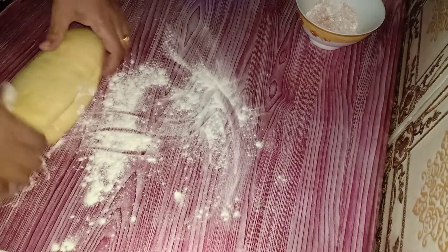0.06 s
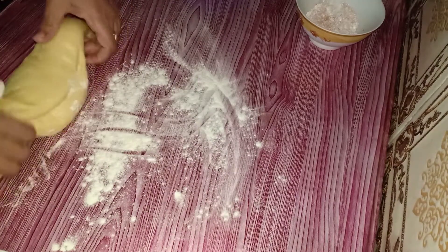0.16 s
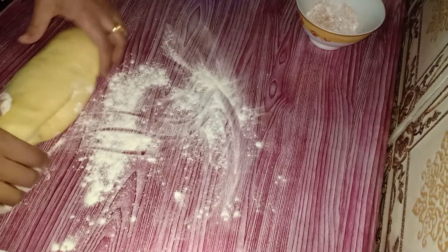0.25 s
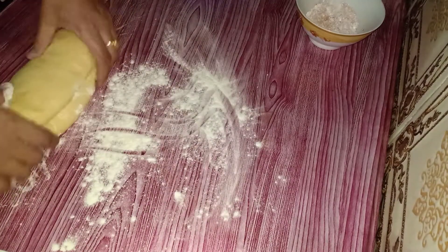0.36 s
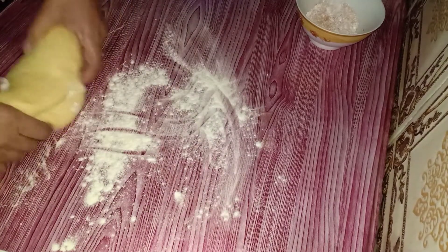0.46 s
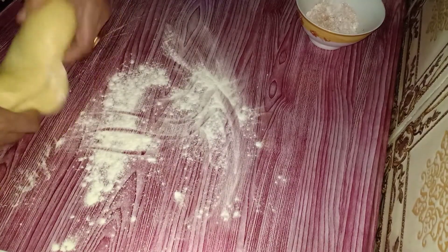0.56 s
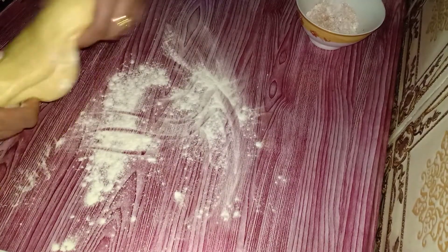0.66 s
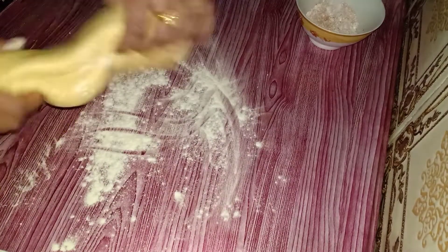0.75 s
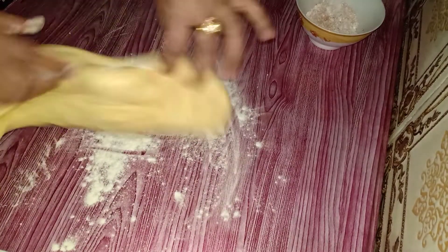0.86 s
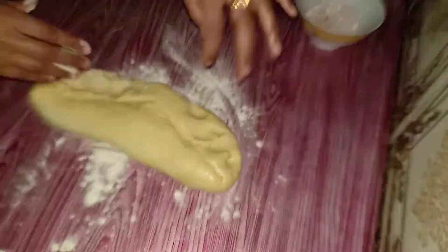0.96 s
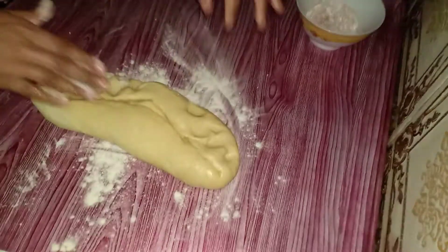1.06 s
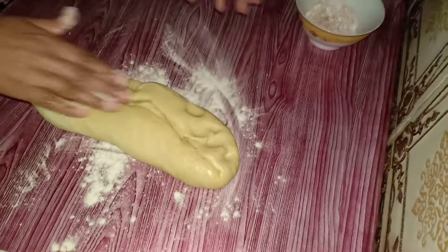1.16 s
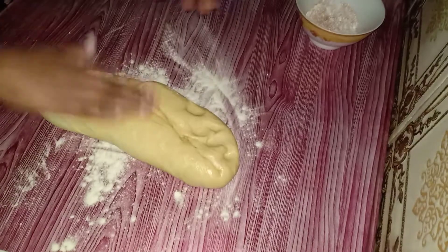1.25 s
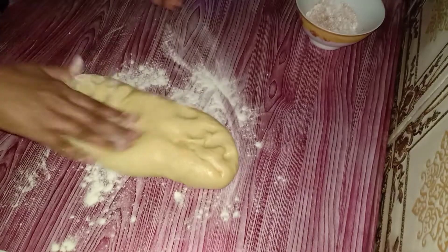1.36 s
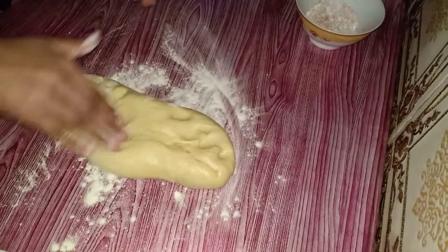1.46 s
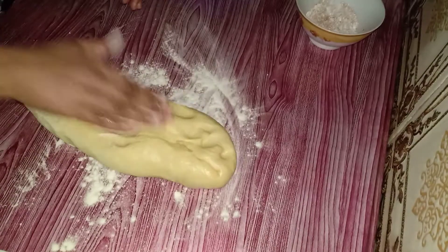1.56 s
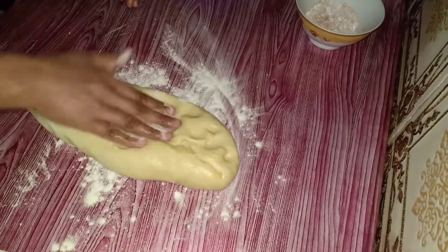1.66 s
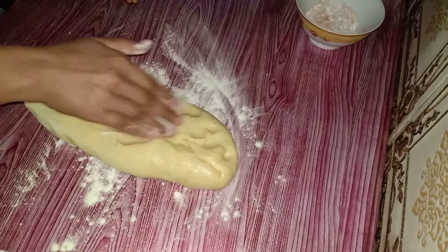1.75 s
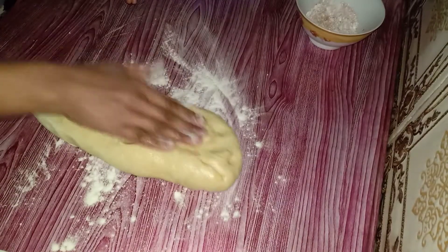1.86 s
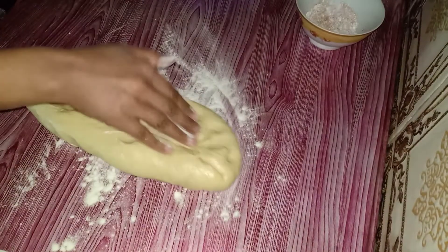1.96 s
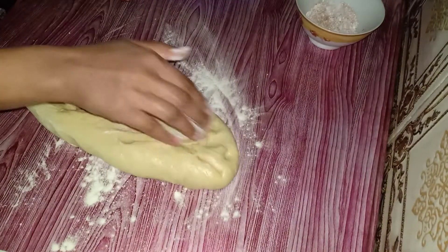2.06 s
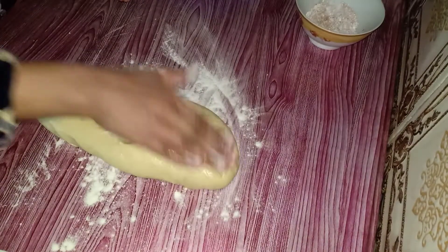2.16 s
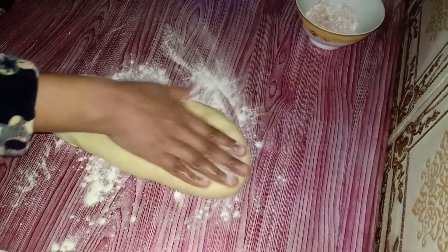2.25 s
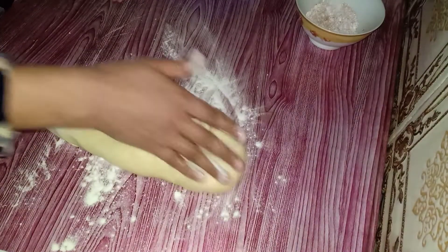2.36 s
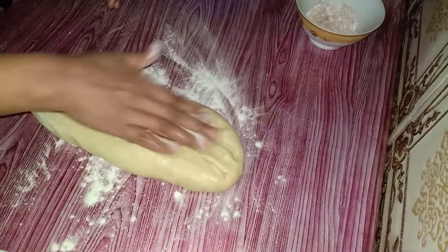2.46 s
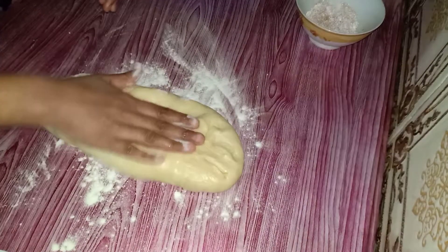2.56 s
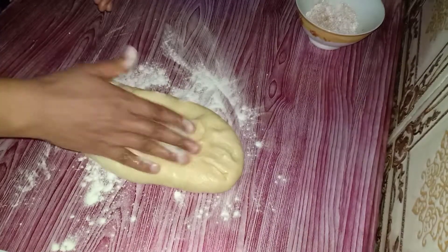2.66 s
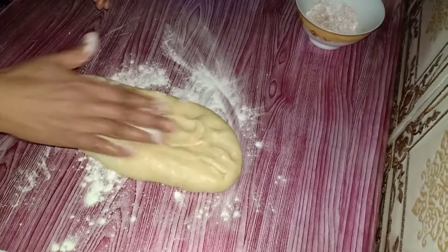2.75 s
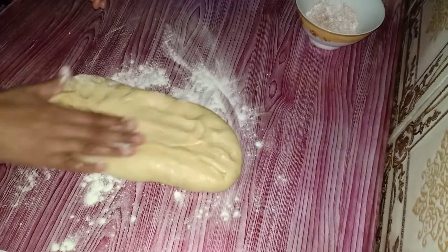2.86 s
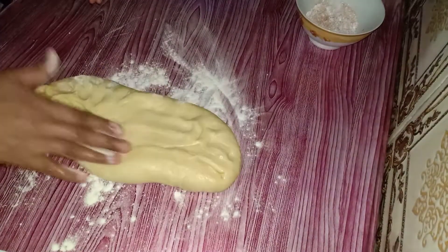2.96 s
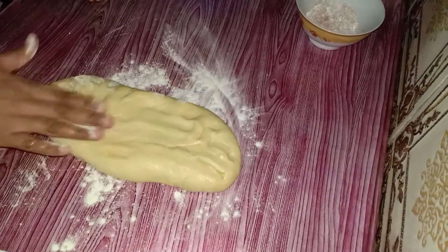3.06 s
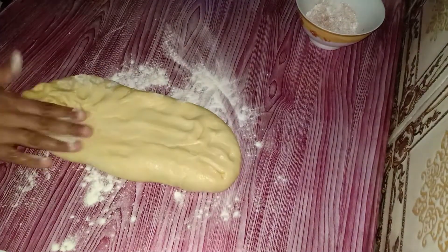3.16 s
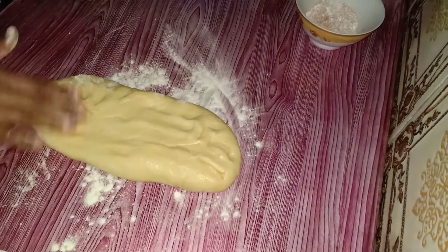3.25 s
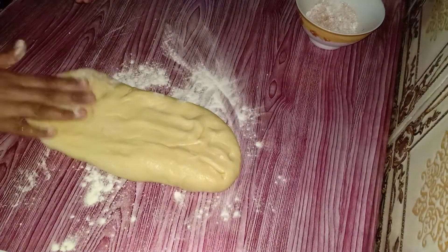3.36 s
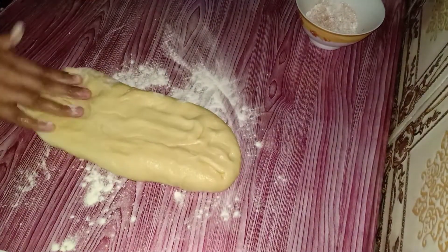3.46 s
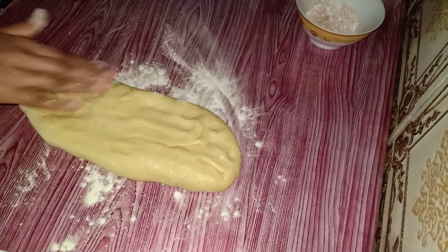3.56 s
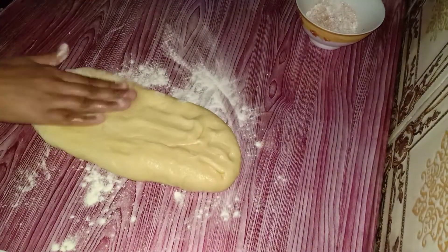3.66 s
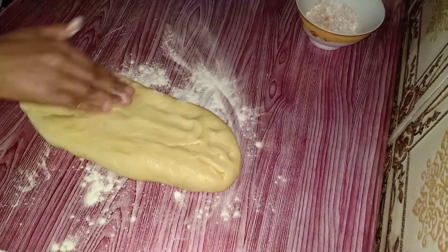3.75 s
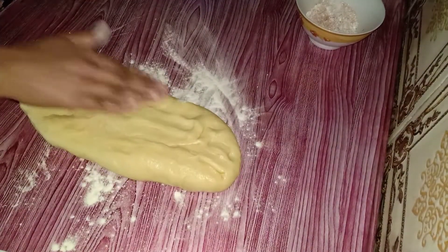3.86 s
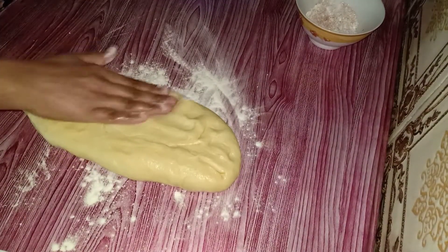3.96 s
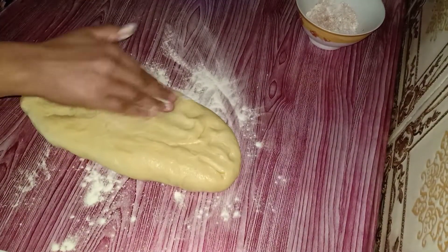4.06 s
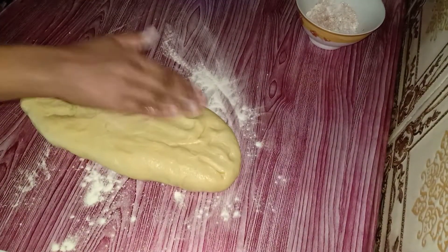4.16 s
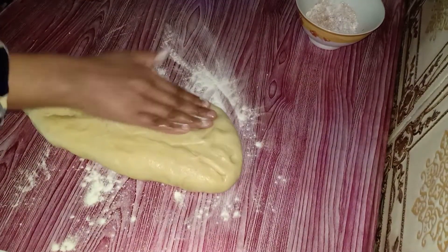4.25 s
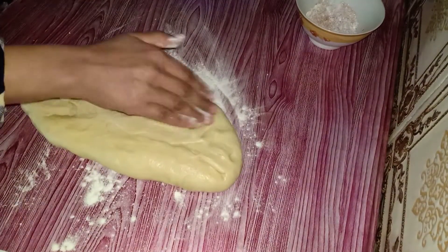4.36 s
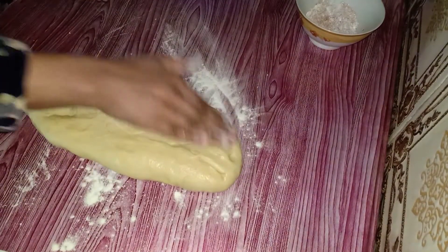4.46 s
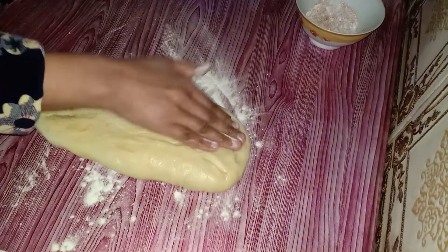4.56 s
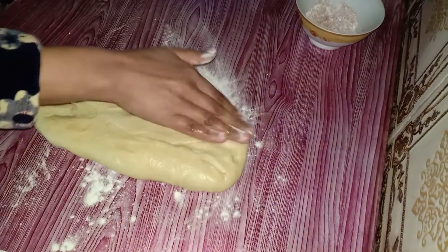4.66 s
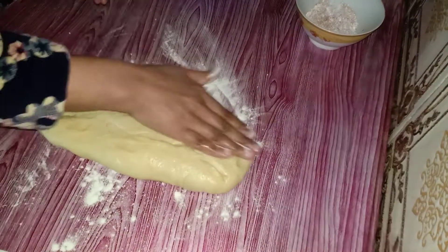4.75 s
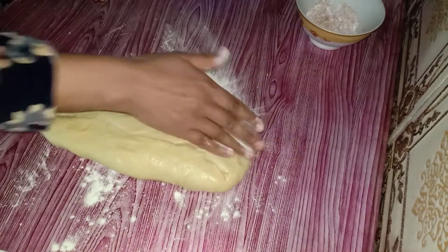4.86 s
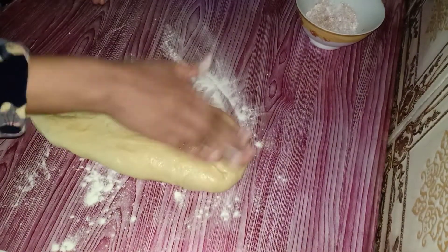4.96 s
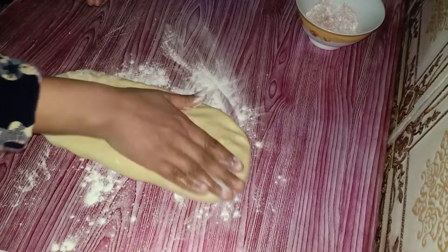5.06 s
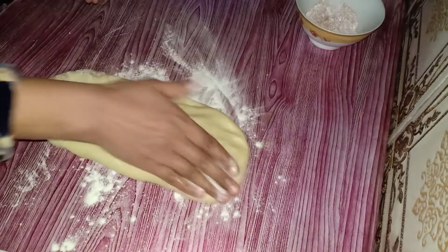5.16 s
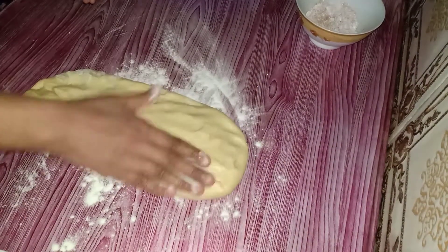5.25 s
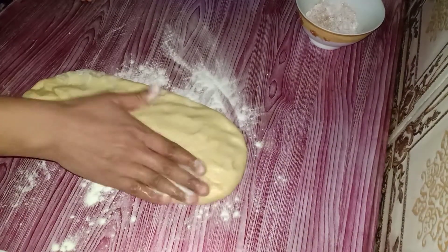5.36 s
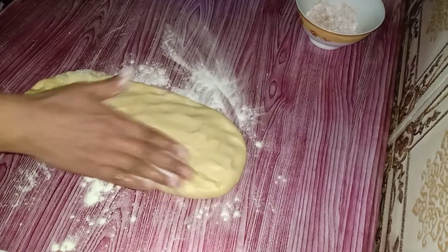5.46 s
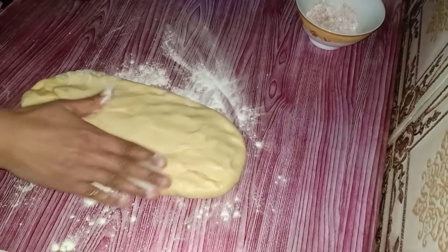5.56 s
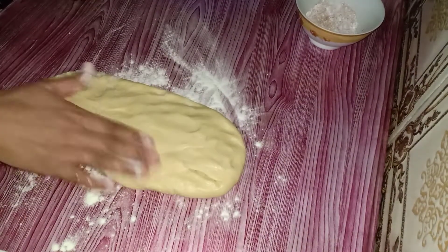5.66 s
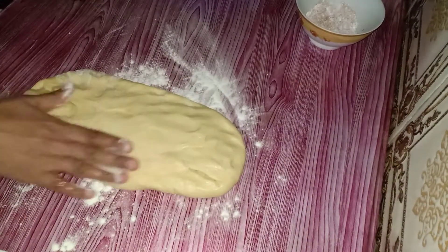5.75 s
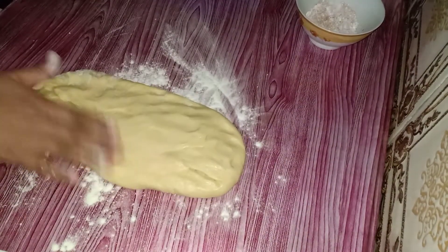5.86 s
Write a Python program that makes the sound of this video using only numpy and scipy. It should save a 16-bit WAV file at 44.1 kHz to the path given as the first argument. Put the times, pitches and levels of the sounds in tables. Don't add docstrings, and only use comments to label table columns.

```python
import sys
import numpy as np
from scipy import signal
from scipy.fft import rfft, irfft, next_fast_len
from scipy.io import wavfile
from scipy.ndimage import uniform_filter1d

SR = 44100
rng = np.random.default_rng(int(sys.argv[2]) if len(sys.argv) > 2 else 0)


def log_audio(samples):
    frames = np.atleast_2d(samples).T
    limited = np.clip(frames, -1, 1)
    pcm = np.round(limited * 32767).astype(np.int16)
    wavfile.write(sys.argv[1], SR, pcm)


def nominal_scale(level):
    x = np.asarray(level, float) / 20
    return 10 ** x


N = 261072
PORT_SIGN = np.array([[1], [-1]])


def rms_one(x):
    return x / np.sqrt(np.mean(x ** 2) + 1e-20)


def at_hz(points, hz):
    table_hz, values = np.array(points)[:, 0], np.array(points)[:, 1]
    return np.interp(np.log(hz), np.log(table_hz), values)


def drift(rate_hz, size):
    r = np.exp(-80 * np.pi * rate_hz / SR)
    white = rng.standard_normal(size // 40 + 2002)
    slow = signal.lfilter([1], [1, -2 * r, r * r], white)[2000:]
    return np.interp(np.arange(size) / 40, np.arange(len(slow)), rms_one(slow))


def ring(x, hz, t60):
    r, w = nominal_scale(-60 / (t60 * SR)), 2 * np.pi * hz / SR
    return signal.lfilter([0, np.sin(w)], [1, -2 * r * np.cos(w), r * r], x + 1e-18)


def coloured(x, spectrum):
    size = next_fast_len(x.shape[-1] + 4096)
    hz = np.maximum(np.arange(size // 2 + 1) * SR / size, 10)
    cepstrum = irfft(at_hz(spectrum, hz) * np.log(10) / 20, size)
    cepstrum[1:size // 2] *= 2
    cepstrum[size // 2 + 1:] = 0
    return irfft(rfft(x, size) * np.exp(rfft(cepstrum)), size)[..., :x.shape[-1]]


# frequency in Hz, likeness from 0 to 1.
PORT_LIKENESS = [(60, 0.99), (180, 0.95), (550, 0.4), (1650, 0.021), (4970, 0.022), (15000, 0.015)]


def diffuse(size, band_gain):
    edges_hz = 30 * 2 ** np.arange(0, 9.1, .5) * 1.03
    white = rng.standard_normal((2, 2, size))
    out = 0
    for k, (low, high) in enumerate(zip(edges_hz, edges_hz[1:])):
        band = signal.butter(2, [low, high], "band", fs=SR, output="sos")
        mid, side = signal.sosfilt(band, white[k % 2])
        hz = np.sqrt(low * high)
        alike = np.clip(at_hz(PORT_LIKENESS, hz), 0, 1)
        out = out + band_gain(hz) * (np.sqrt(1 + alike) * mid + np.sqrt(1 - alike) * side * PORT_SIGN)
    return out


def stroke(spectrum, level_db, grain_db, flicker_db, flicker_hz):
    grains = rng.standard_normal((2, N)) * nominal_scale(grain_db * rng.standard_normal(N))
    return rms_one(coloured(grains, spectrum)) * nominal_scale(level_db + flicker_db * drift(flicker_hz, N))


def strokes(rows, rest_db):
    t = np.arange(0, N + 32, 32) / SR
    level_db = np.full(len(t), float(rest_db))
    for s, length, first_db, last_db, rise, fall in rows:
        held = np.interp(t, [s, s + length], [first_db, last_db])
        before, after = np.maximum(s - t, 0), np.maximum(t - s - length, 0)
        level_db = np.maximum(level_db, held - rise * before - fall * after)
    return np.interp(np.arange(N) / SR, t, level_db)


def strike(rows, families):
    rows, out = np.array(rows), np.zeros((2, N))
    at = (rows[:, 0] * SR).astype(int)
    family_gain_db = rows[:, 1:2] + np.c_[np.zeros(len(rows)), rows[:, 2:]]
    luck = rng.standard_normal((len(rows), 2, 20))
    count = 0
    for column, (modes, contact_hz, family_db, opposed) in enumerate(families):
        family = 0
        for hz, level_db, t60 in modes:
            strength = nominal_scale(family_gain_db[:, column] + family_db + level_db + 1.5 * luck[:, 0, count])
            lean = np.clip(hz / 2700.0, 0, 1) * luck[:, 1, count]
            clicks = np.zeros((2, N))
            clicks[:, at] = strength * (1 + lean * PORT_SIGN)
            family = family + ring(clicks, hz, t60) * (-1) ** (count * opposed)
            count += 1
        out += signal.sosfilt(signal.butter(2, contact_hz, fs=SR, output="sos"), family)
    return out


# frequency in Hz, level in dB per Hz.
FLOOR_COLOUR = [(18, -78), (30, 16), (48, -2.5), (86, -6.5), (120, -2.5), (226, -9), (596, -13), (860, -14),
                (1310, -24), (2270, -17), (3450, -28), (5110, -32), (9600, -41), (13900, -38),
                (15800, -55.5)]


def floor():
    tone = diffuse(N, lambda hz: nominal_scale(0.88 * drift(16.0, N)))
    return nominal_scale(-58.5 + 2.5) * rms_one(coloured(tone, FLOOR_COLOUR))


# start in seconds, peak in dB, pitch in Hz, t60 in seconds.
BLOW_NOTES = [(0.006, -49.5, 303, 0.14), (0.06, -49, 294, .1), (0.365, -41, 340, 0.047),
              (1.036, -11, 353, 0.04), (1.041, -21.5, 148.6, 0.27), (1.041, -27.5, 165, 0.42),
              (1.045, -35.5, 267.4, 0.38), (1.057, -28.5, 343, 0.078), (1.035, -26, 62.6, 0.27),
              (1.036, -27, 310, 0.12), (1.037, -32, 968, 0.087), (1.33, -36, 344, 0.082),
              (1.33, -43, 220, 0.057), (1.636, -39.5, 1200, 0.011), (1.636, -41, 337, 0.11),
              (1.636, -34.5, 214, 0.11), (2.613, -31, 356.6, 0.11), (2.617, -31.5, 515, 0.07),
              (2.627, -34.5, 258, 0.095), (3.425, -47.5, 353, .06), (3.425, -56, 674, .06),
              (3.735, -39, 406, .08), (3.991, -45.5, 520, 0.047), (3.991, -55, 950, .05),
              (4.79, -40, 410, 0.087), (4.79, -50, 667, .08), (4.79, -55, 536, .07),
              (5.078, -48, 400, 0.11), (5.078, -57, 500, 0.08), (5.349, -40.5, 283, 0.095),
              (5.349, -41, 512, 0.065), (5.352, -52.5, 718, 0.11)]
# frequency in Hz, left minus right in dB.
NOTE_LEANING = [(200, 0.1), (350, -4), (500, 1.5)]


def blow_notes():
    rise_s = 0.0027
    out, t = np.zeros((2, N + SR)), np.arange(SR // 2) / SR
    for s, peak_db, hz, t60 in BLOW_NOTES:
        swell = 1 - np.exp(-t / rise_s)
        note = swell * nominal_scale(peak_db + 3.5 - 60 * t / t60) * np.sin(2 * np.pi * hz * t)
        i = int(s * SR)
        out[:, i:i + len(t)] += note * nominal_scale(at_hz(NOTE_LEANING, hz) / 2 * PORT_SIGN)
    return out[:, :N]


# start in seconds, low board in dB, then middle and high board in dB above it.
BOARD_KNOCKS = [(0.008, -49, -21, -23), (0.031, -45.5, -11, -25), (0.053, -49, -12, -26),
                (0.068, -46.5, -13, -3), (0.364, -55.5, 12.5, -18), (0.385, -48, -2, -7),
                (0.405, -54, -2, -8), (0.679, -51, -1, -2.5), (1.018, -24.5, -31, -7),
                (1.029, -23.5, 3, -5.5), (1.037, -21, -10, -3), (1.043, -44.5, -13, 22),
                (1.058, -33, -19, -6), (1.065, -36, -7, -5), (1.099, -42, -20, -12), (1.33, -36, -17, -28),
                (1.637, -38, -15.5, -11.5), (1.95, -53.5, -1.5, -0.5), (2.28, -54.5, 4.5, 3.5),
                (2.312, -43.5, -7, -9), (2.615, -32, -3, -9), (2.627, -33.5, -10, -19),
                (2.906, -45.5, -7, -2), (3.18, -54.5, -32, 9), (3.425, -48, -24, -4),
                (3.733, -37.5, -8, -22), (3.991, -50, -8, -3.5), (4.252, -47.5, 4.5, -2.5),
                (4.533, -59, 10, -18), (4.79, -41.5, 0.5, -8), (5.077, -48.5, -2, -3),
                (5.347, -39, -11, -9), (5.573, -47.5, -2, -4), (5.8, -48, -6, 0)]
# frequency in Hz, level in dB, t60 in seconds.
BOARD_LOW = [(282, -3.5, 0.18), (283.5, 7.5, 0.049), (330, -1, 0.041), (352.2, 2.5, 0.1), (357, 4.5, 0.038)]
BOARD_MIDDLE = [(441, -2, 0.15), (489.6, -1.9, 0.12), (522.4, -0.5, 0.088), (544, 4.5, 0.036),
                (620, -3.5, 0.041)]
BOARD_HIGH = [(659, 1, 0.049), (693, 0, 0.15), (751, -6.5, 0.19), (818, -0.5, 0.1), (924, 3, 0.031),
              (1068, 0, 0.032), (1098, 1, 0.046)]


def top_board():
    return strike(BOARD_KNOCKS, [(BOARD_LOW, 500., -3.0, True), (BOARD_MIDDLE, 700., -4.0, True),
                                 (BOARD_HIGH, 1200., -7.0, True)])


# frequency in Hz, t60 in seconds.
KITCHEN_T60 = [(100, 0.47), (350, 0.42), (900, 0.49), (2400, 0.49), (6000, 0.49), (14000, 0.9)]
# frequency in Hz, level in dB.
KITCHEN_COLOUR = [(100, -2), (300, -6), (1000, -1), (3000, 2.5), (7000, 1), (15000, -1)]


def kitchen(x):
    t = np.arange(SR) / SR
    echoes = diffuse(SR, lambda hz: nominal_scale(at_hz(KITCHEN_COLOUR, hz) - 60 * t / at_hz(KITCHEN_T60, hz)))
    echoes *= 1 - np.exp(-(t / 0.00067) ** 2)
    return nominal_scale(-32.5) * signal.fftconvolve(x[None], echoes, axes=1)[:, :N]


# start in seconds, length in seconds, hiss in dB at touch, at lift.
HAND_SLIDES = [(0.054, 0.11, -72, -65.5), (0.17, 0.15, -63, -75), (0.39, 0.28, -64.5, -65),
               (0.78, 0.28, -73.5, -72.5), (0.978, 0.039, -87, -56), (1.03, 0.081, -57, -73.5),
               (1.35, 0.17, -72, -75.5), (1.646, 0.2, -72, -75.5), (1.93, 0.18, -71.5, -72.5),
               (2.272, .21, -74, -69), (2.63, 0.13, -99, -68.5), (2.89, 0.16, -77, -70.5),
               (3.197, 0.14, -73, -76.5), (3.412, 0.18, -73, -74), (3.714, 0.22, -75, -74),
               (3.977, 0.18, -82, -70), (4.232, 0.22, -71.5, -74.5), (4.525, 0.21, -78, -71),
               (4.798, .15, -81, -68), (5.094, 0.18, -72.5, -71), (5.352, 0.15, -81, -68),
               (5.574, 0.13, -78, -69.5), (5.8, .12, -75, -77)]
# start in seconds, peak in dB.
FLOUR_SNAPS = [(0.3711, -65), (0.463, -46), (0.535, -46), (0.9906, -61), (1.0196, -61.5), (1.039, -48.5),
               (1.3286, -58), (1.6367, -59), (1.9224, -61), (2.2787, -58), (2.3047, -55), (2.617, -43),
               (2.9, -65), (3.179, -59), (3.426, -56), (3.739, -51.5), (3.991, -55), (4.5346, -65),
               (4.6927, -63), (4.789, -55), (5.075, -58), (5.349, -58), (5.363, -60), (5.672, -73),
               (5.8, -57)]
# frequency in Hz, level in dB per Hz.
FLOUR_COLOUR = [(3820, -6), (6500, -4), (8430, -9), (10000, -12.5), (11500, -5.5), (12700, -9.5),
                (13500, 1.5), (14500, -10.5), (15600, -0.5)]
# frequency in Hz, level in dB per Hz.
RUB_COLOUR = [(590, -29), (1000, -2.5), (1240, 6), (1640, 2.5), (2130, 2.5), (2600, 7.5), (3300, 0),
              (5330, 1), (9000, -27.5), (11700, -71.5)]


def sliding_hands():
    touch_db_per_s, lift_db_per_s = 505, 245
    puff_db, puff_follows, puff_s = -58, 0.76, 0.017
    rub_over_hiss_db = 4
    slides, puffs, rubs = [], [], []
    for s, length, touch, lift in HAND_SLIDES:
        slides.append((s, length, touch, lift, touch_db_per_s, lift_db_per_s))
        rubs.append((s, length, rub_over_hiss_db + (touch + lift) / 2, rub_over_hiss_db + lift, 150., 110.))
    for s, snap_db in FLOUR_SNAPS:
        level_db = puff_db + puff_follows * (snap_db + 49.0)
        puffs.append((s, .004, level_db, level_db, 3000, 9.3 / puff_s))
    hiss_db = np.maximum(strokes(slides, rest_db=-81), strokes(puffs, rest_db=-120))
    hiss = stroke(FLOUR_COLOUR, hiss_db, grain_db=4.5, flicker_db=0.96, flicker_hz=25.)
    rub = stroke(RUB_COLOUR, strokes(rubs, rest_db=-84), grain_db=1.8, flicker_db=0.93, flicker_hz=30.)
    return nominal_scale(4.0) * hiss + nominal_scale(1.5) * rub


# start in seconds, slab in dB, then room air, low drum, high drum in dB above it.
LOAF_PUSHES = [
    (0.055, -44, 6, -6, -7),
    (0.078, -50, 15, -9, -8),
    (0.175, -59, -19, -8, -17),
    (0.365, -48.5, 6, 7.5, -1),
    (0.678, -48, -20, -20, -25),
    (1.02, -34, -20, 2, 2),
    (1.033, -27, -11, 2.5, -16),
    (1.038, -20.5, -7.5, 0, 2),
    (1.045, -31.5, -15, -1, 10),
    (1.058, -33, -2.5, 1.5, 6),
]
PAT_PUSHES = [(1.332, -36, -9.5, -19, 9.5), (1.637, -45.5, 4, -34, 14.5), (1.949, -51, -3.5, -24, -1),
              (2.28, -51.5, 7, -14, 10), (2.313, -42, -2.5, -9, -8), (2.614, -47.5, -26, -8, 14),
              (2.627, -36.5, 7, -7, 11), (2.9117, -32, -7, -15, 1.5), (3.185, -33.5, -1.5, -11, 1.5),
              (3.426, -32.5, -7, -19, -7), (3.737, -38.5, -1.5, -11, 9.5), (3.742, -38.5, 4, -1, -7.5),
              (3.993, -36, -2.5, -31, 1.5), (4.254, -44, -0.5, -9, -24), (4.53, -62, 17.5, -7, -9),
              (4.792, -32, -1, -14, -9), (5.078, -36, -4, -17, -34), (5.349, -35.5, -4, -39, -7),
              (5.575, -39.5, 0.5, -11, -24), (5.803, -35, -0.5, -18, -2)]
# frequency in Hz, level in dB, t60 in seconds.
SLAB = [(149.4, -3.5, 0.29), (158.4, -0.5, 0.34), (169, -16, 0.016)]
ROOM_AIR = [(81, -10, 0.31), (99.1, -2, 0.52), (109.9, -1.5, 0.84)]
DRUM_LOW = [(192.4, 9, 0.12), (183, -18, 0.3)]
DRUM_HIGH = [(215, 3, 0.067), (231, -41, 0.1)]


def table_body():
    return strike(LOAF_PUSHES + PAT_PUSHES, [(SLAB, 200., -4.0, False), (ROOM_AIR, 140., -4.0, True),
                                             (DRUM_LOW, 250., -3.0, False), (DRUM_HIGH, 300., -3.0, False)])


# start in seconds, level in dB.
LEG_ROCKS = [(0.056, -53), (0.362, -58), (0.678, -68), (1.019, -42), (1.032, -36), (1.04, -37),
             (1.058, -36), (1.331, -51), (1.636, -55), (1.948, -64), (2.279, -52), (2.313, -65),
             (2.614, -59), (2.627, -53), (2.91, -45), (3.184, -52), (3.427, -59), (3.737, -55),
             (3.993, -66), (4.252, -57), (4.532, -69), (4.79, -48), (5.077, -53), (5.349, -56),
             (5.573, -58), (5.802, -62)]
# frequency in Hz, level in dB, t60 in seconds.
LEGS = [(62.4, 16, 0.32), (65, 0.1, 0.6)]


def table_legs():
    return strike(LEG_ROCKS, [(LEGS, 90., -4.0, True)])


# time in seconds, crackle in dB.
FINGER_LIFTS = [(0.06, -69), (0.41, -60), (1.82, -71), (1.96, -67.5), (2.11, -78), (2.24, -73), (2.55, -73),
                (2.83, -68), (3.03, -67), (3.31, -66.5), (3.56, -69), (4.08, -71), (4.14, -72), (4.43, -74),
                (4.6, -73), (4.69, -64), (4.93, -77), (4.97, -71), (5.27, -63), (5.5, -67), (5.7, -67),
                (5.9, -76)]
# frequency in Hz, level in dB per Hz.
STICKY_COLOUR = [(1500, -31), (2300, -3), (3300, -19), (4300, -8), (5000, 2), (6100, -3.5), (7000, -23),
                 (9000, -41)]


def lifting_fingers():
    rise_db_per_s, fall_db_per_s = 259, 500.
    level_db = strokes([(s, .004, db, db, rise_db_per_s, fall_db_per_s) for s, db in FINGER_LIFTS], rest_db=-120)
    return stroke(STICKY_COLOUR, level_db, grain_db=10.0, flicker_db=3.0, flicker_hz=60.)


# peak in seconds, scuff in dB, rise in dB/s, fall in dB/s.
LOAF_JERKS = [
    (0.073, -50.5, 234, 300),
    (0.176, -55, 120, 119),
    (0.37, -45, 2500, 107),
    (0.6, -65, 60, 69),
]
# frequency in Hz, level in dB per Hz.
SCUFF_COLOUR = [(120, -31), (200, -10), (371, -13), (490, -2), (566, -14), (952, -12), (1140, -18),
                (2000, -25), (2600, -75)]


def loaf_scuff():
    lifted_s = 0.633
    drag_db = strokes([(s, .001, db, db, rise, fall) for s, db, rise, fall in LOAF_JERKS], rest_db=-120)
    drag_db -= 600 * np.maximum(np.arange(N) / SR - lifted_s, 0)
    scuff = nominal_scale(-2.0) * stroke(SCUFF_COLOUR, drag_db, grain_db=1.0, flicker_db=0.87, flicker_hz=36.0)
    return scuff + 0.28 * scuff[::-1]


# start in seconds, peak in dB, trapped-air pitch in Hz, broad splat in dB, echo in dB.
DOUGH_PEELS = [(0.1732, -43, 2460, -14, 0), (0.1817, -50, 2400, -20, -9), (0.3711, -58, 1420, -8, 4),
               (0.3805, -52, 2300, -18, 11.5), (0.4627, -30, 2580, -14, -7), (0.4635, -32.5, 2900, -15, -8),
               (0.468, -43, 4320, -17, -14), (0.4741, -39, 2470, -8, -7), (0.5314, -46, 2650, -9, -5),
               (0.5344, -48.5, 4730, -7, -10), (5.5084, -63, 2100, 5, -7)]
LOAF_LANDING = [
    (1.0201, -27.5, 1930, -11, -11.5),
    (1.0217, -31, 2580, -12, -23),
    (1.0246, -36, 1800, -15, -24),
    (1.0273, -33, 1420, -11, -24),
    (1.0308, -24, 2570, -14, -32),
    (1.0365, -29, 1320, -23, -18),
    (1.0384, -21.5, 1740, -19, -9),
    (1.0388, -26, 2400, -26, -29),
    (1.0426, -41, 1980, -9, -28),
]
PALM_SMACKS = [(1.3302, -39.5, 2820, -5, -2.5), (1.3359, -48, 3020, -9, -8),
               (1.6375, -35.5, 2550, -13.5, -8.5), (2.2797, -52, 1490, 4, 6.5),
               (2.2844, -51, 5630, -3, -11), (2.306, -41.5, 2820, -12, -11),
               (2.315, -31.5, 2700, -21, -14.5), (2.6158, -33, 1470, -7, -8),
               (2.6168, -28.5, 4100, -25, -2), (2.62, -29, 3860, -3, -7), (2.6201, -27.5, 5980, -17, -22),
               (2.6253, -26.5, 1900, -11, -19), (2.9081, -47, 2040, -0.5, -11),
               (3.181, -35, 4840, -12.5, -10), (3.4261, -46, 1900, -0.5, 2.5), (3.7305, -54, 2000, 0, -1),
               (3.7344, -38, 2610, -7, -4), (3.7399, -45, 4900, 0.5, -14), (3.9927, -34.5, 2480, -6, -9.5),
               (4.2538, -47.5, 3800, -5, -0.5), (4.2571, -46.5, 6050, -5, -14), (4.787, -54, 2930, -4, -6),
               (4.7915, -37, 2640, -2.5, -6), (5.0783, -41, 4530, -3.5, -3), (5.3496, -38, 3560, -4, -6),
               (5.3502, -31, 4350, -9, -12.5), (5.3528, -38, 3020, -10, -15), (5.5732, -59, 1940, 2, 6),
               (5.5765, -57, 2150, 2, -1), (5.799, -57, 2000, 4, -10), (5.8012, -46.5, 5440, -8, -0.5)]
FINGERTIP_TICKS = [(2.2915, -61, 2630, -1, -9), (2.4214, -52.5, 5400, -3, -13), (2.542, -61, 5170, 0, -3),
                   (2.9075, -40, 5020, -10, -3.5), (2.9205, -45, 5650, -6, -13),
                   (3.9825, -42, 1600, -13, -14), (3.987, -55, 3940, -4, -4), (4.5364, -53, 1790, -0.5, -1),
                   (4.5563, -55, 4600, 2.5, -15), (4.277, -54, 3060, -5, -10),
                   (5.3621, -44, 4500, -12, -18), (5.3644, -40, 4740, -13, -12)]
# frequency in Hz, level in dB per Hz.
SPLAT_COLOUR = [(290, 6.5), (500, 5.5), (935, -12), (2040, -13), (2920, -3.5), (3350, -5), (3850, -2.5),
                (4430, -3), (6060, -7.5), (8000, -24), (10400, -70.5)]
BRIGHT_COLOUR = [(1760, -31.5), (3000, 2.5), (3220, -9.5), (4620, -0.5), (5760, -2), (8750, -29),
                 (13700, -38), (15300, -56), (15800, -63)]
DULL_COLOUR = [(320, -43.5), (550, -29.5), (777, -7), (875, -6), (1020, -10.5), (1390, -13), (1700, -11),
               (2370, -8.5), (3600, -25), (4680, -60)]
LOAF_COLOUR = [(400, -37), (800, -5), (1250, -11), (1740, -5), (2400, -6), (3000, -15.5), (3300, -23.5),
               (5800, -25), (8000, -50)]


def smacks():
    rise_s, crackle_s, pocket_s = 0.00052, 0.0021, 0.001
    lead_db, lead_s = -7, 0.0042
    port_swing = 0.53
    pocket, splat, body, sent = np.zeros((4, 2, N))
    t = np.arange(-700, 1500) / SR
    after = np.maximum(t, 0)
    rise = np.exp(-(np.minimum(t, 0) / rise_s) ** 2)
    contacts = ((DOUGH_PEELS, 6), (LOAF_LANDING, 22.5), (PALM_SMACKS, 11), (FINGERTIP_TICKS, 15.5))
    for rows, dull_db in contacts:
        for s, peak_db, hz, splat_db, echo_db in rows:
            shared, own = rng.standard_normal(len(t)), rng.standard_normal((2, len(t)))
            burst = (shared + 1.57 * own) * rise * np.exp(-after / crackle_s)
            lead = own * nominal_scale(lead_db) * np.exp(-np.abs(t) / lead_s)
            phase = own[0, 0] + port_swing * np.sign(own[1, 0]) * PORT_SIGN
            tone = rise * np.exp(-after / pocket_s) * np.cos(2 * np.pi * hz * t + phase)
            i = int((s + t[0]) * SR)
            span = slice(i, i + len(t))
            pocket[:, span] += nominal_scale(peak_db + 1.0) * tone
            splat[:, span] += nominal_scale(peak_db + splat_db) * (burst + lead)
            body[:, span] += nominal_scale(peak_db + echo_db + dull_db) * burst
            pulse = nominal_scale(peak_db + echo_db + np.array([0, dull_db]))
            sent[:, int(s * SR)] = pulse * np.sign(own[:, 1])
    landing = slice(int(LOAF_LANDING[0][0] * SR) - 1, int(LOAF_LANDING[-1][0] * SR) + 1)
    loaf = np.zeros(N)
    loaf[landing] = sent[1, landing]
    sent[:, landing] = 0
    walls = nominal_scale(21.5) * coloured(sent[0], BRIGHT_COLOUR)
    walls += nominal_scale(24.5) * coloured(sent[1], DULL_COLOUR)
    walls += nominal_scale(18.5) * coloured(loaf, LOAF_COLOUR)
    direct = pocket + nominal_scale(5.5) * coloured(splat, SPLAT_COLOUR) + nominal_scale(2.0) * coloured(body, DULL_COLOUR)
    return direct, walls


# time in seconds, pitch in Hz, level in dB.
LOAF_GROAN = [
    (0.362, 482, -75),
    (0.372, 481, -57),
    (0.41, 486.4, -49),
    (0.438, 480, -59),
    (0.46, 462, -78),
]


def groan():
    octave_db, flicker_db = -10, 1
    s, hz, db = np.transpose(LOAF_GROAN)
    t = np.arange(N) / SR
    turn = 2 * np.pi * np.cumsum(np.interp(t, s, hz)) / SR
    level_db = np.interp(t, s, db, left=-200, right=-200) + 3.5 + flicker_db * drift(40., N)
    return nominal_scale(level_db) * (np.sin(turn) + nominal_scale(octave_db) * np.sin(2 * turn))


def snaps():
    rows, clicks = np.array(FLOUR_SNAPS), np.zeros(N)
    clicks[(rows[:, 0] * SR).astype(int)] = nominal_scale(rows[:, 1] + 11.0)
    fade = np.exp(-1 / (0.00093 * SR))
    envelope = uniform_filter1d(signal.lfilter([1], [1, -fade], clicks), size=130)
    return rms_one(coloured(rng.standard_normal((2, N)), FLOUR_COLOUR)) * envelope


def scene():
    thuds = blow_notes() + top_board() + table_body() + table_legs()
    slaps, walls = smacks()
    knock = signal.sosfilt(signal.butter(2, 200., "high", fs=SR, output="sos"), thuds.mean(axis=0))
    echoes = kitchen(nominal_scale(-2.0) * knock + walls)
    brushing = sliding_hands() + lifting_fingers() + loaf_scuff()
    return floor() + thuds + echoes + brushing + slaps + groan() + snaps()


def low_pass(x):
    return signal.sosfilt(signal.butter(12, 15940, fs=SR, output="sos"), x)


# frequency in Hz, left minus right in dB.
PORT_BALANCE = [(60, -4), (110, -1.5), (200, -2), (380, -3), (700, -1), (1290, -1), (2380, -2),
                (4400, -3.5), (8120, 3), (15000, -3)]


def record(dry):
    bass_cut_hz, top_cut_hz, offset = 58, 15710, 0.001
    ports = [coloured(port, [(hz, side * db / 2) for hz, db in PORT_BALANCE]) for port, side in zip(dry, (1, -1))]
    mix = signal.sosfilt(signal.butter(6, bass_cut_hz, "high", fs=SR, output="sos"), ports)
    mix = signal.sosfilt(signal.cheby2(18, 60, top_cut_hz + 260, fs=SR, output="sos"), mix)
    mix = mix + offset
    return low_pass(mix)


dry = scene()
out = record(dry)
log_audio(out)
```